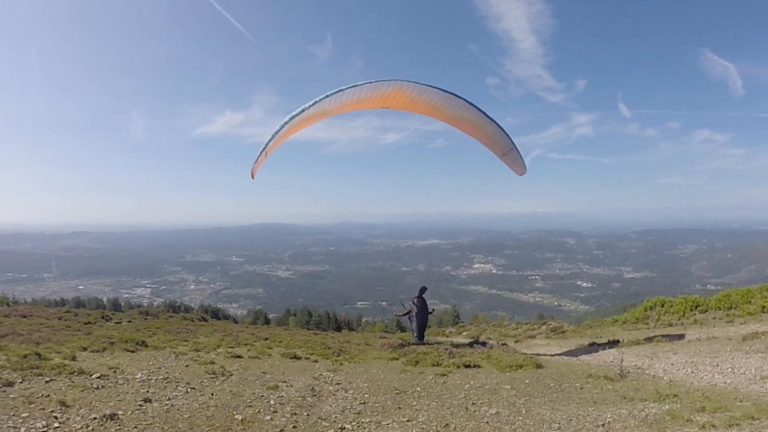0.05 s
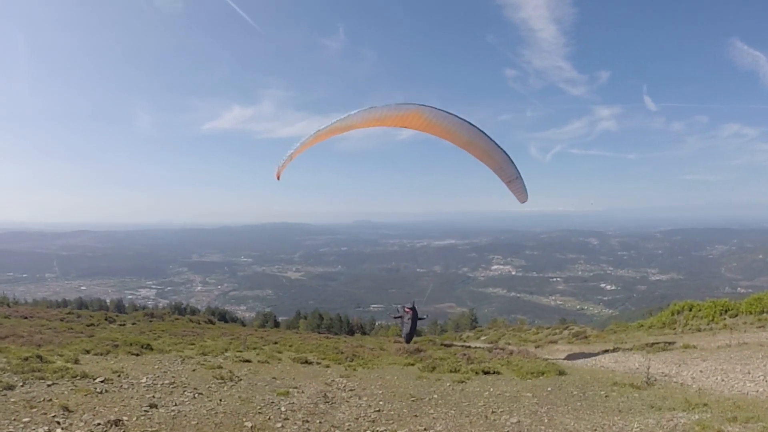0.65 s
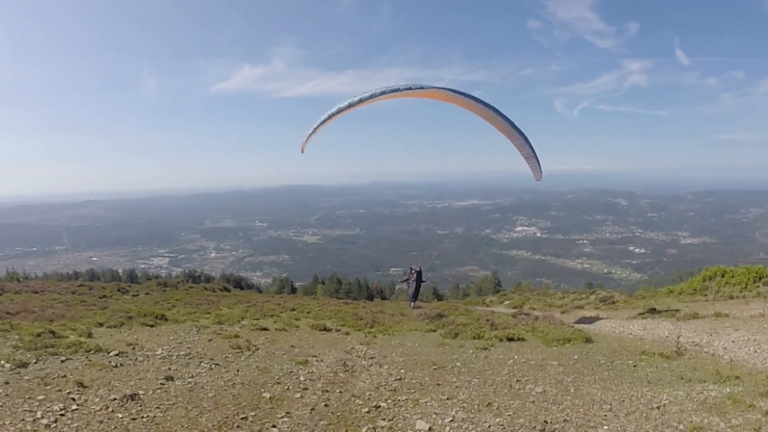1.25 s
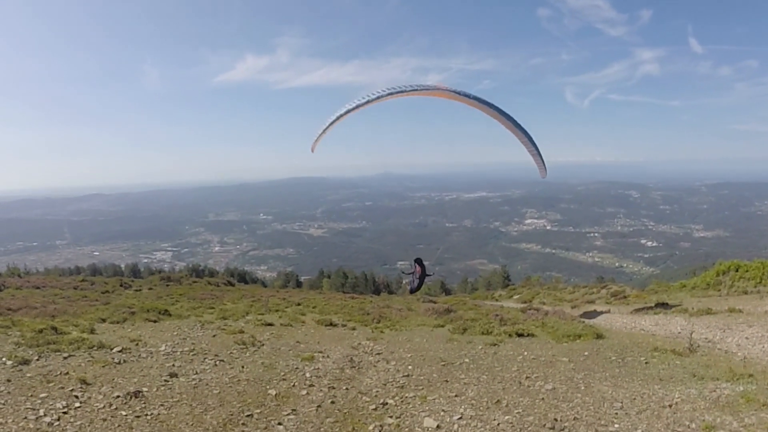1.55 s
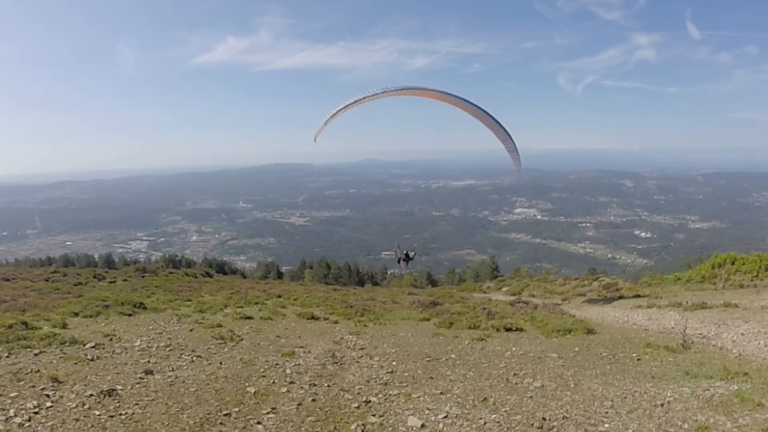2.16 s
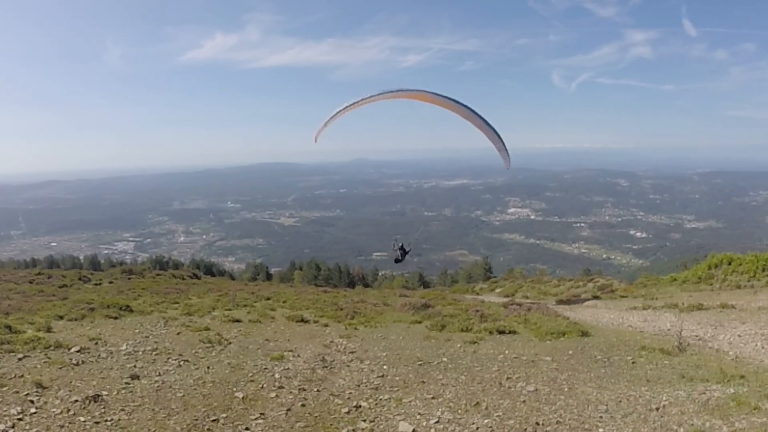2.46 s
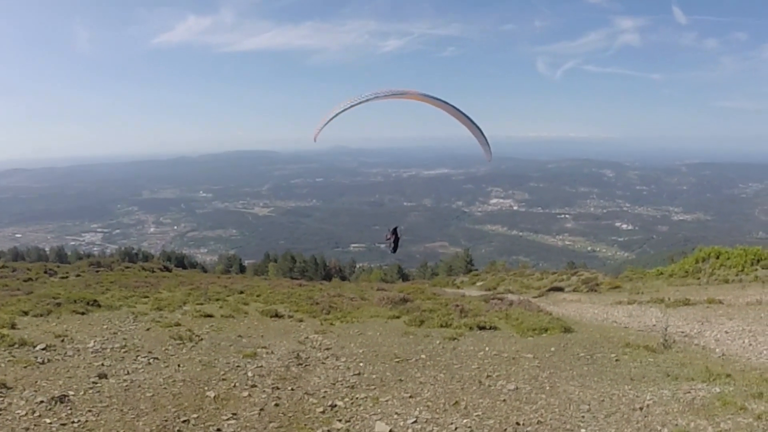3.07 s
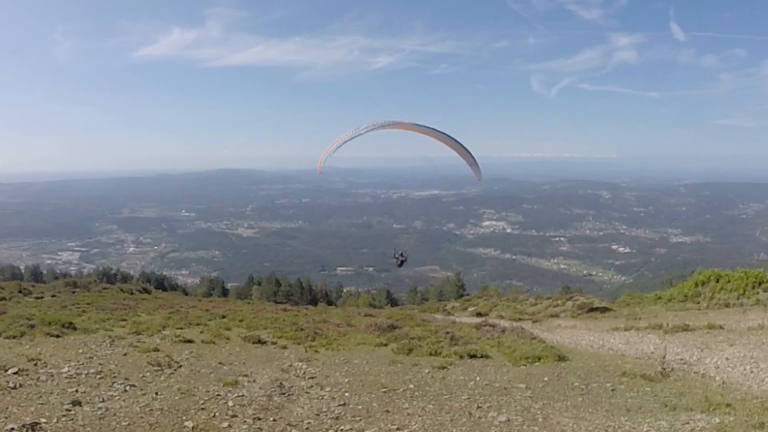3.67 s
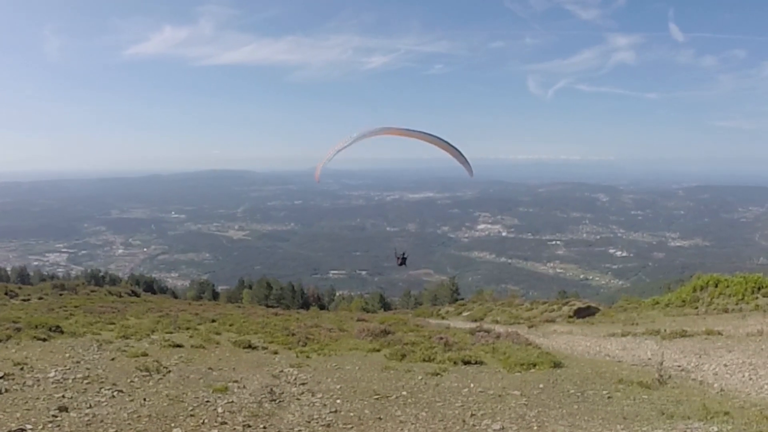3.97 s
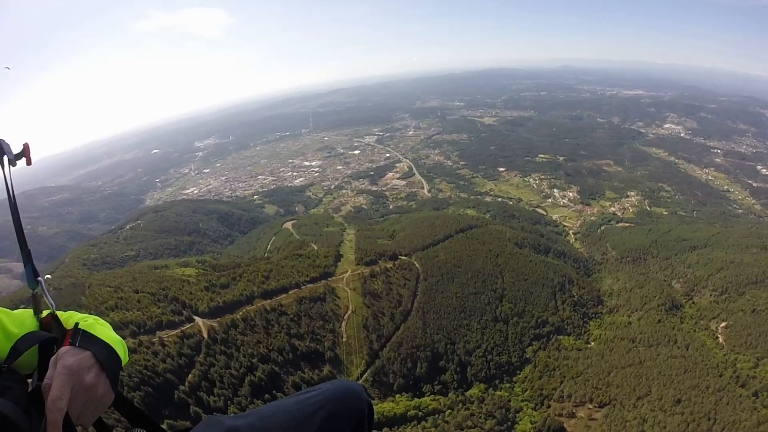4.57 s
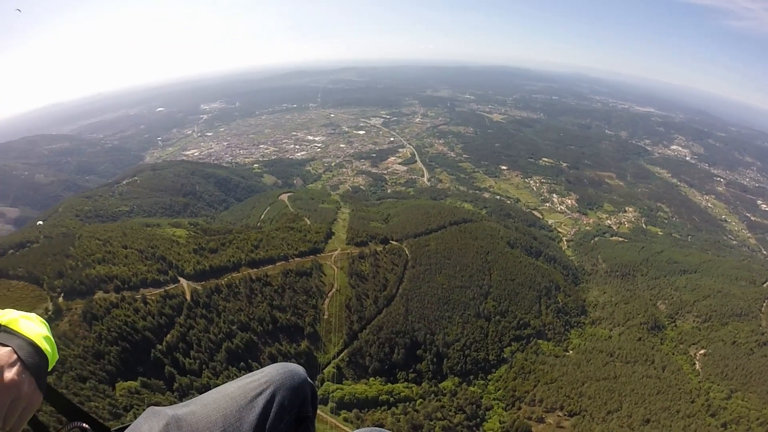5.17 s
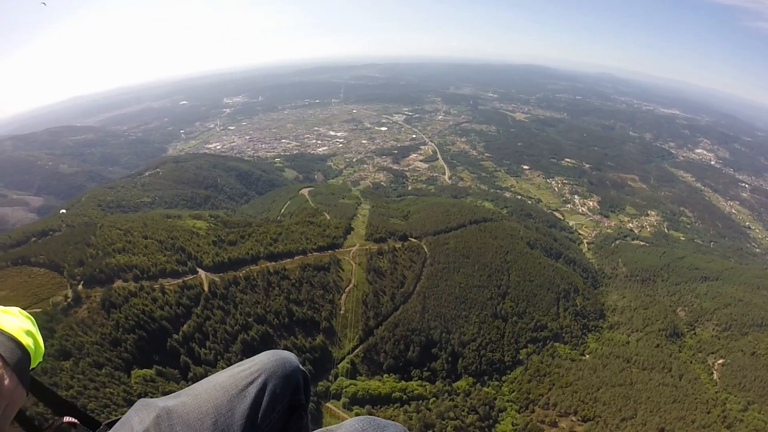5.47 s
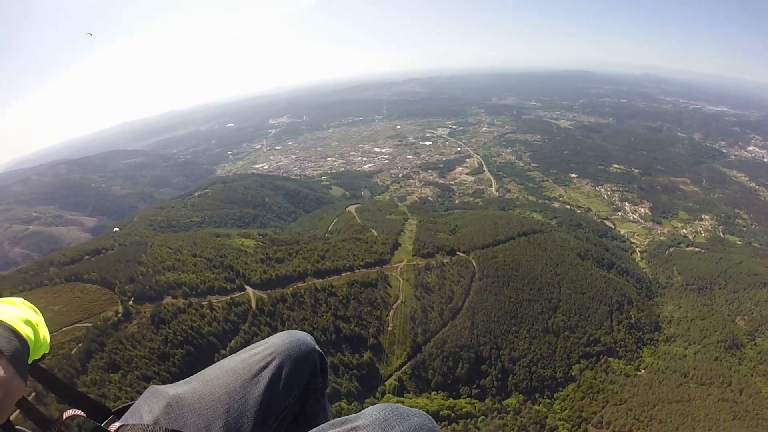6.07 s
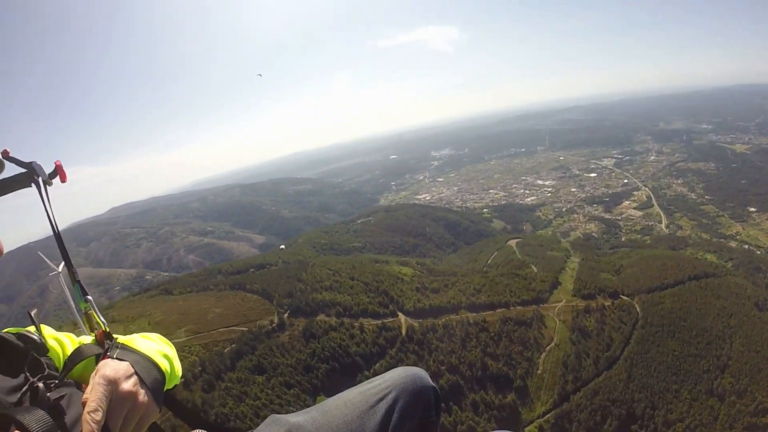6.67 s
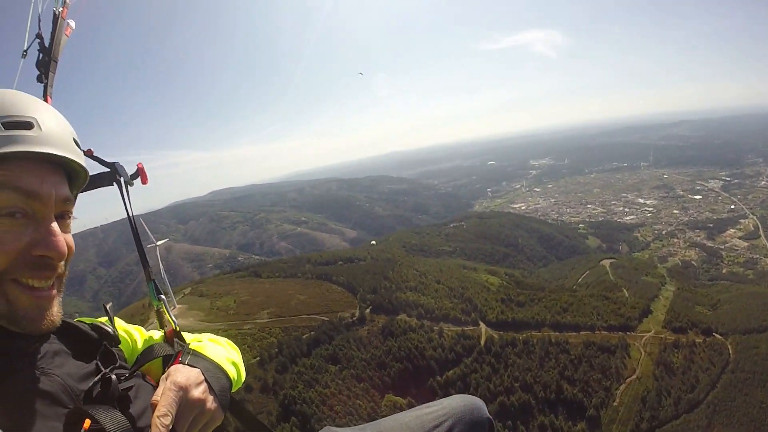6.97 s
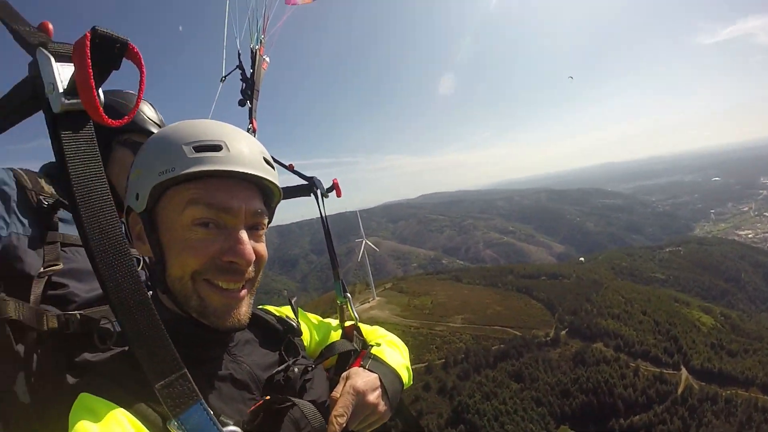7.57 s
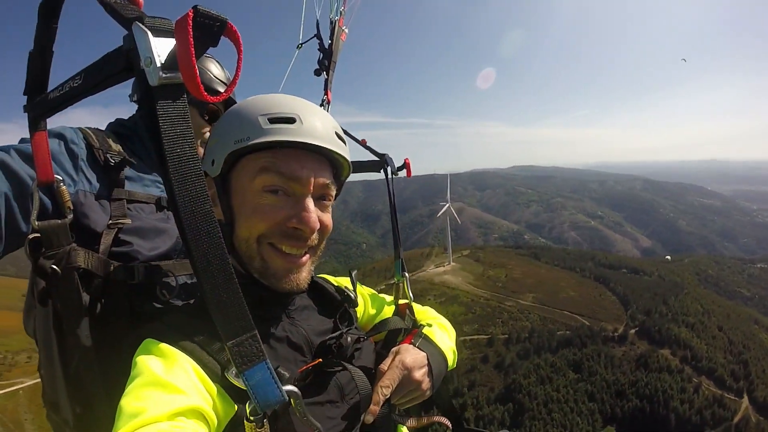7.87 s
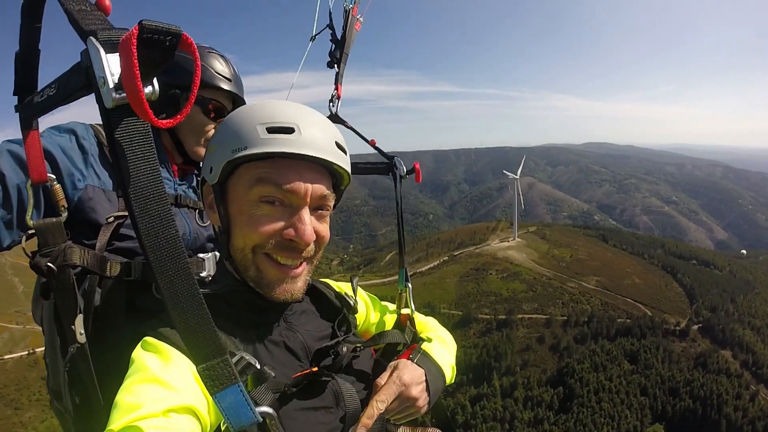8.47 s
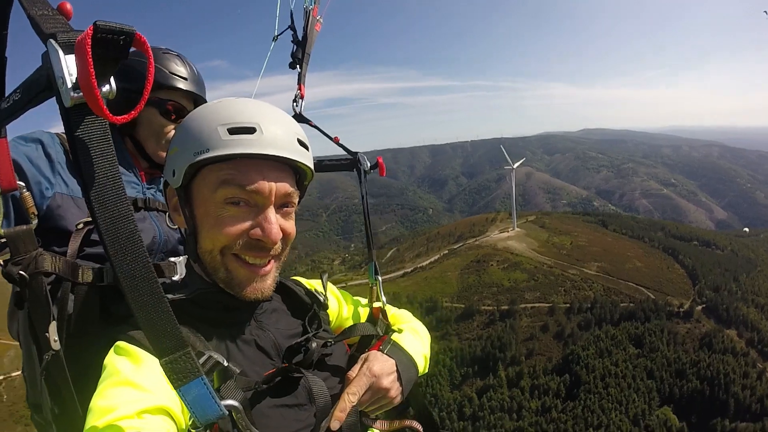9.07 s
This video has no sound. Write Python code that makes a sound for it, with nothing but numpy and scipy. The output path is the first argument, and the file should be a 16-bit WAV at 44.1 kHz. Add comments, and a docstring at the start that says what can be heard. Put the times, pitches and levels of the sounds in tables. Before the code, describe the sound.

Soft, low gusts flutter on the microphone over an even hiss of open air, with a faint swish of paraglider cloth and a single nearby click. Halfway through, the microphone is suddenly airborne, in a louder hissing rush with low buffeting and a breathy, steady-pitched whistle. A cluster of loud, close handling knocks hits the camera case, after which the rush eases and the whistle stands out more.

```python
"""Hilltop: a light breeze rumbles on a camera's microphone, a wing's cloth swishes faintly, and
one sharp click sounds close by. Then, abruptly, a paraglider in flight: air rushes past the
camera, buffets its microphone and sings in the gaps of its case. The hand that turns the camera
knocks it several times. An even hiss of open air lies under both scenes."""
import sys
import numpy as np
from scipy import signal
from scipy.fft import rfft, irfft
from scipy.io import wavfile
from scipy.ndimage import uniform_filter1d

SR = 44100
rng = np.random.default_rng(int(sys.argv[2]) if len(sys.argv) > 2 else 0)


def generate_wav(sig):
    """Save sig (samples, or channels by samples) to the path in sys.argv[1] as 16-bit PCM at SR."""
    pcm = np.round(np.clip(np.atleast_2d(sig).T, -1, 1) * 32767).astype(np.int16)
    wavfile.write(sys.argv[1], SR, pcm)


N = 411453
FFT_SIZE, HOP = 1024, 256
BINS_HZ = np.fft.rfftfreq(FFT_SIZE, 1 / SR)
FRAMES_S = np.arange(N // HOP + 5) * HOP / SR
TIME_S = np.arange(N) / SR
FLIGHT_AT_S, BAND_LIMIT_HZ = 4.487, 15200
LEE_AT_S, LEE_HALF_S = 7.92, 0.21  # camera faces backwards: microphone in the lee

# Airflow strength in flight: t/s, level/dB
FLIGHT_FLOW = [(4.49, -49), (4.7, -45.5), (5.06, -39), (5.42, -39.5), (5.6, -41.5), (5.8, -38.5),
               (6.0, -40), (6.25, -41.5), (6.45, -40.5), (6.68, -38.4), (7.0, -44.5), (7.32, -43.2),
               (7.6, -47), (7.8, -44.0), (8.8, -45.5), (8.94, -41.5), (9.1, -46), (9.25, -42.5)]
# Case cavities: f/Hz, width/Hz, relative level/dB, growth with gusts/(dB/dB)
CASE_CAVITIES = [(3317, 570, 4, 0), (3520, 850, -5, 0.4), (5145, 480, -4, 0.9), (5780, 220, -9, 1.6)]
# Whistle flares: t/s, peak/dB
WHISTLE_FLARES = [(8.975, -28), (9.06, -31)]
# Hand knocks: t/s, push/dB, push sigma/s, tick/dB, tick cutoff/Hz, grating/dB
CASE_KNOCKS = [(6.8280, -10, .0015, -33, 2000, -28), (6.9124, -6.5, 0.002, -14, 4970, -26.5),
               (7.2934, -15, 0.0027, -45, 2000, -41), (7.3016, -12.5, 0.0023, -24.5, 2200, -34),
               (7.3830, -20, 0.0013, -45, 2000, -42), (7.6905, -0.1, .0013, -15.5, 1260, -24.5),
               (7.8088, -4, .0015, -8.5, 9000, -25), (7.9266, -7.5, 0.0021, -14, 12000, -25)]
# Joint slips within a tick: nominal delay/s, relative level/dB
TICK_SLIPS = [(0, 5), (.00063, -7), (.00147, -5)]
# Modes of the click: f/Hz, level/dB, t60/s
CLICK_RING = [(1050, -54, 0.0053), (1836, -52, 0.15), (1930, -56, .07), (2030, -20, 0.0087),
              (2500, -29, 0.01), (2870, -36.5, 0.025), (4000, -31, 0.015), (5050, -33, 0.0076),
              (6640, -33.5, 0.0092), (8070, -33, 0.0068), (9250, -30, .005), (11200, -19.5, .004),
              (11900, -23, 0.0043), (13300, -33, .004)]
# Hilltop breeze strength: t/s, level/dB
BREEZE_LEVEL = [(0, -50), (0.45, -48), (1.2, -46.5), (1.55, -51.5), (2.0, -50), (3.1, -46.5), (3.7, -51),
                (4.0, -48.5), (4.48, -48)]
# Single hilltop gusts: t/s, half-width/s, unweighted boost/dB
BREEZE_GUSTS = [(0.212, 0.072, 5), (0.43, .055, 7.5), (0.786, 0.032, 10), (3.14, .05, 1.5)]

# Spectral shapes: f/Hz, relative density/dB
RUSH_SPECTRUM = [(20, -26), (400, -8), (800, -11.5), (1150, -14), (1700, -4.5), (1950, -1), (2400, -1.5),
                 (2800, -3.5), (3900, -2.5), (4400, -19), (5850, -31), (6100, -28), (7600, -33),
                 (13000, -67)]  # air over the case
BUFFET_SPECTRUM = [(8, 1), (25, 5.5), (45, -1), (90, -9.5), (180, -12), (300, -18), (500, -23), (800, -27),
                   (1500, -25), (4000, -75)]  # eddies on the microphone in flight
SIZZLE_SPECTRUM = [(1000, -10), (4000, -1), (5300, 12), (6150, 0.5), (7000, 3), (7600, -8.5), (8500, -3.5),
                   (9300, -9), (10200, -4.5), (11500, -19), (13000, -32)]  # finest eddies
TICK_SPECTRUM = [(100, 7), (350, 9.5), (700, 1), (1300, 5), (1650, -11.5), (2100, 2.5), (2700, -10),
                 (4000, -8.5), (5200, -4), (7500, -18.5), (11500, -28), (15000, -37)]  # joint slipping
GRATE_SPECTRUM = [(100, 1), (350, 1.5), (600, -4), (1100, 0.5), (2000, -4.5), (3500, -13), (5500, -19),
                  (7500, -29), (10000, -39), (13000, -49)]  # joint grating
RUMBLE_SPECTRUM = [(8, 1.5), (22, -1), (45, -4.5), (70, -10.5), (110, -18.5), (200, -37), (400, -46),
                   (1500, -85)]  # breeze on the microphone
PUFF_SPECTRUM = [(20, -10), (70, -7), (130, 0), (200, -5.5), (320, -7.5), (500, -20), (1000, -37),
                 (3000, -62)]  # small breeze eddies
AIR_SPECTRUM = [(20, 0.5), (200, 1.5), (500, -1.5), (1000, -4.5), (2000, -9), (3400, -12.2), (5000, -16.5),
                (7000, -21), (10000, -26), (15000, -34)]  # open air


def rush(base_db=-38.5, lee_db=-5, gust_share=0.58):
    """Airflow hisses over the case; gusts brighten it and drive the higher cavities harder."""
    lee = step(FRAMES_S, LEE_AT_S, LEE_HALF_S)
    gust_db = (gust_share * flow_db(FRAMES_S) - .8 + lee_db * lee)[:, None]
    # Mid-turn, air blows straight across the first cavity.
    crosswise_db = 5.5 * bump(FRAMES_S, at_s=6.7, half_s=.3)[:, None]
    power = gain(spectrum_db(RUSH_SPECTRUM) - 0.071 * gust_db) ** 2
    for k, (hz, width_hz, db, growth) in enumerate(CASE_CAVITIES):
        cavity_db = db + growth * gust_db + crosswise_db * (k == 0)
        power = power + gain(cavity_db) ** 2 * resonance(hz, width_hz)
    shape_db = 10 * np.log10(power / power.sum(1, keepdims=True))
    air = unit_rms(noise(shape_db, patchy_db=0.65))
    return air * gain(base_db + flow_db(TIME_S) + 0.9 * wander(31))


def buffet(base_db=-39.0, flow_share=0.22, lee_db=-2, lull_db=-6, deep_hz=100):
    """Eddies beat on the microphone; in the lee they weaken and the deepest fall into a lull."""
    eddies = steady(noise(spectrum_db(BUFFET_SPECTRUM), patchy_db=0.5), share=0.1, span_s=0.19)
    deep = signal.sosfiltfilt(signal.butter(2, deep_hz, fs=SR, output="sos"), eddies)
    lull = gain(lull_db * bump(TIME_S, at_s=8.7, half_s=0.34))
    eddies = eddies + deep * (lull - 1)
    lee = step(TIME_S, LEE_AT_S, LEE_HALF_S)
    return eddies * gain(base_db + flow_share * flow_db(TIME_S) + lee_db * lee + 0.75 * wander(18))


def whistle(hz=1408, core_hz=78, skirt_hz=230, skirt_db=-7, base_db=-41.5, knee_db=-4.0):
    """A gap in the case sings: narrow core, breathy skirt. Grows with airflow, then levels off."""
    drive_db = -10 * np.log10(1 + gain(knee_db - flow_db(TIME_S)) ** 2)
    turned_db = 4.0 * step(TIME_S, at_s=7.85, half_s=0.1)  # gap turns into the wind
    flare_envelope = sum(gain(db) * bump(TIME_S, at_s, half_s=0.0033) for at_s, db in WHISTLE_FLARES)
    flares = flare_envelope * np.sin(2 * np.pi * hz * TIME_S)
    power = resonance(hz, core_hz) + gain(skirt_db) ** 2 * resonance(hz, skirt_hz)
    note = steady(noise(10 * np.log10(power), patchy_db=0.9), share=0.35, span_s=0.071)
    return note * gain(base_db + drive_db + turned_db) + flares


def knocks(rebound=0.55, lag_s=0.0064, rebound_sigma_s=0.0041, slip_lead_s=0.001387, leak_hz=10):
    """Each knock pushes the case in; it springs back more slowly. The joint grates and ticks."""
    out, lead_s = np.zeros(N), 0.02
    t = np.arange(SR // 10) / SR - lead_s
    grate_impulse = snap(GRATE_SPECTRUM, BAND_LIMIT_HZ)
    spring_back = rebound * np.exp(-((t - lag_s) / rebound_sigma_s) ** 2 / 2)
    for at_s, push_db, sigma_s, tick_db, cutoff_hz, grate_db in CASE_KNOCKS:
        push = spring_back - np.exp(-(t / sigma_s) ** 2 / 2)
        friction = signal.fftconvolve(rng.standard_normal(len(t)), grate_impulse)[:len(t)]
        grating = unit_rms(friction) * bump(t, at_s=0, half_s=0.0027)
        add(out, at_s - lead_s, gain(push_db) * push + gain(grate_db) * grating)
        tick = snap(TICK_SPECTRUM, cutoff_hz)
        stretch = rng.uniform(0.87, 1.2)
        for delay_s, slip_db in TICK_SLIPS:
            add(out, at_s - slip_lead_s + delay_s * stretch, -gain(tick_db + slip_db) * tick)
    # Pressure leaks away: shallow undershoot.
    return signal.lfilter(*signal.butter(1, leak_hz, "high", fs=SR), out)


def click(at_s=2.406):
    """One small, hard click; its strong modes die within milliseconds, leaving a faint ring."""
    out, t = np.zeros(N), np.arange(SR // 8) / SR
    for k, (hz, db, t60_s) in enumerate(CLICK_RING):
        add(out, at_s, (-1) ** k * gain(db - 60 * t / t60_s) * np.sin(2 * np.pi * hz * t))
    return out


def breeze(puff_base_db=-63, puff_share=.55):
    """Light gusts rumble on the microphone; smaller eddies flutter in separate puffs."""
    breeze_db = curve_db(BREEZE_LEVEL, TIME_S)
    gust_db = sum(db * bump(TIME_S, at_s, half_s) for at_s, half_s, db in BREEZE_GUSTS)
    rumble = steady(noise(spectrum_db(RUMBLE_SPECTRUM), patchy_db=3.0), share=0.53, span_s=0.054)
    puffs = unit_rms(noise(spectrum_db(PUFF_SPECTRUM), patchy_db=1.0) * gain(2.6 * wander(16)))
    rumble_db = breeze_db + 0.82 * gust_db + .3 + 0.99 * wander(7)
    puff_db = puff_base_db + puff_share * (breeze_db - breeze_db.mean()) + 1.15 * gust_db
    return gain(rumble_db) * rumble + gain(puff_db) * puffs


def sizzle(base_db=-61.0, flow_share=0.26, lee_db=-3, lee_share=.9):
    """Gusts add a thin top to the rush; in the lee only the stronger ones do."""
    airflow_db = flow_db(TIME_S)
    shelter_db = step(TIME_S, LEE_AT_S, LEE_HALF_S) * (lee_db + lee_share * (airflow_db + 3))
    hiss = unit_rms(noise(spectrum_db(SIZZLE_SPECTRUM), patchy_db=.9))
    return hiss * gain(base_db + flow_share * airflow_db + shelter_db + 0.88 * wander(6))


def canopy(level_db=-67.5):
    """Distant swish of cloth and lines; swells and fades as the wing lifts off."""
    power = resonance(3350, 750) + 0.2 * resonance(5000, 1500)
    swish = unit_rms(noise(10 * np.log10(power), patchy_db=2.5))
    return gain(level_db) * bump(TIME_S, at_s=.92, half_s=0.82) * swish


def open_air(level_db=-57.5):
    """Even hiss of open air."""
    return gain(level_db) * unit_rms(noise(spectrum_db(AIR_SPECTRUM), patchy_db=0.6))


def flow_db(t, full_speed_db=-39):
    """Airflow relative to full speed."""
    return curve_db(FLIGHT_FLOW, t) - full_speed_db


def curve_db(table, t):
    """Level interpolated over time."""
    return np.interp(t, *np.transpose(table))


def spectrum_db(table, hz=BINS_HZ):
    """Level interpolated over log frequency."""
    points_hz, db = np.transpose(table)
    return np.interp(np.log(hz + 1), np.log(points_hz + 1), db)


def noise(field_db, patchy_db):
    """Noise shaped over time and frequency, with drifting patches."""
    real, imag, patches = rng.standard_normal((3, len(FRAMES_S), len(BINS_HZ)))
    patches = uniform_filter1d(patches, size=9, axis=0)
    patches = unit_rms(uniform_filter1d(patches, size=16, axis=1))
    spectra = (real + 1j * imag) * gain(field_db + patchy_db * patches)
    return signal.istft(spectra.T, nperseg=FFT_SIZE, noverlap=FFT_SIZE - HOP)[1][:N]


def steady(x, share, span_s):
    """Evens out a share of a noise's own swells; rms 1."""
    power = abs(signal.hilbert(x)) ** 2
    mean_power = abs(uniform_filter1d(power, int(span_s * SR) + 1, mode="wrap"))
    return unit_rms(x / (mean_power + 1e-9) ** (share / 2))


def wander(rate_hz):
    """Smooth random drift; rms 1."""
    hz = np.fft.rfftfreq(N, 1 / SR)
    return unit_rms(irfft(rfft(rng.standard_normal(N)) / (1 + (hz / rate_hz) ** 2), N))


def resonance(hz, width_hz):
    """Steep-sided power response; 1 at centre."""
    return 1 / (1 + ((BINS_HZ - hz) / width_hz * 2) ** 2 / 2) ** 2


def snap(table, cutoff_hz):
    """Minimum-phase click of a given spectrum, low-passed; peak 1."""
    hz = abs(np.fft.fftfreq(FFT_SIZE, 1 / SR))
    db = spectrum_db(table, hz) - 10 * np.log10(1 + (hz / cutoff_hz) ** 10)
    log_gain = np.log(gain(np.maximum(db, -100)))
    impulse = np.fft.ifft(np.exp(np.conj(signal.hilbert(log_gain)))).real
    return impulse / abs(impulse).max()


def bump(t, at_s, half_s):
    """Gaussian; peak 1."""
    return np.exp(-((t - at_s) / half_s) ** 2)


def step(t, at_s, half_s):
    """Smooth 0 to 1."""
    return .5 + .5 * np.tanh((t - at_s) / half_s)


def gain(db):
    """dB to amplitude."""
    return 10 ** (np.asarray(db) / 20)


def unit_rms(x):
    """Scales to rms 1."""
    return x / np.sqrt(np.mean(x ** 2) + 1e-20)


def add(mix, at_s, sound):
    """Mixes a sound in, in place."""
    part = mix[round(at_s * SR):][:len(sound)]
    part += sound[:len(part)]


def scene():
    """Hilltop, then flight; open air throughout. Mono."""
    hilltop = breeze() + canopy() + click()
    flight = rush() + sizzle() + whistle() + buffet() + knocks()
    return (open_air() + np.where(TIME_S < FLIGHT_AT_S, hilltop, flight))[None]


def record(dry):
    """Soft clip of the hardest knocks near full scale, then low-pass."""
    ceiling_db = -.2
    rounded = dry / (1 + abs(dry / gain(ceiling_db)) ** 20) ** (1 / 20)
    lowpass = signal.firwin(511, BAND_LIMIT_HZ, window=("kaiser", 9), fs=SR)
    return signal.oaconvolve(rounded, lowpass[None], "same")


dry = scene()
out = record(dry)
generate_wav(out)
```